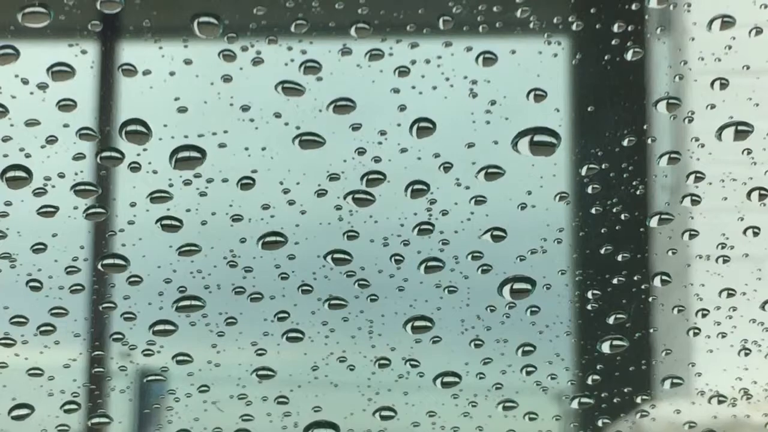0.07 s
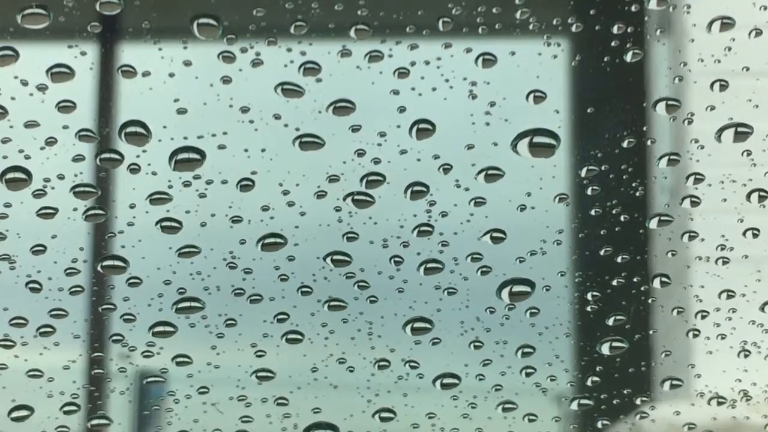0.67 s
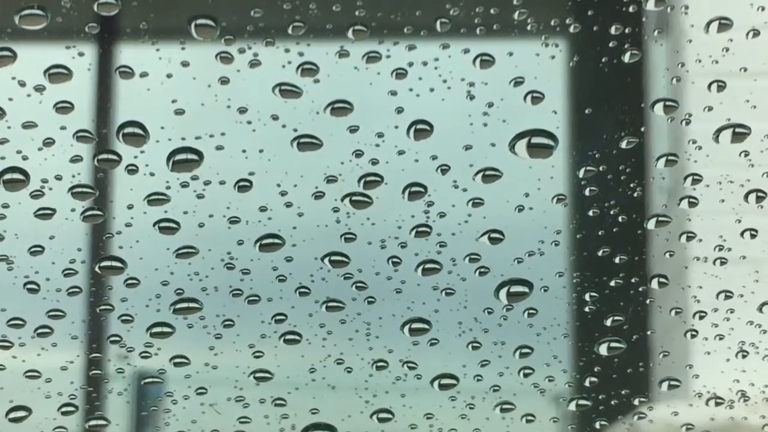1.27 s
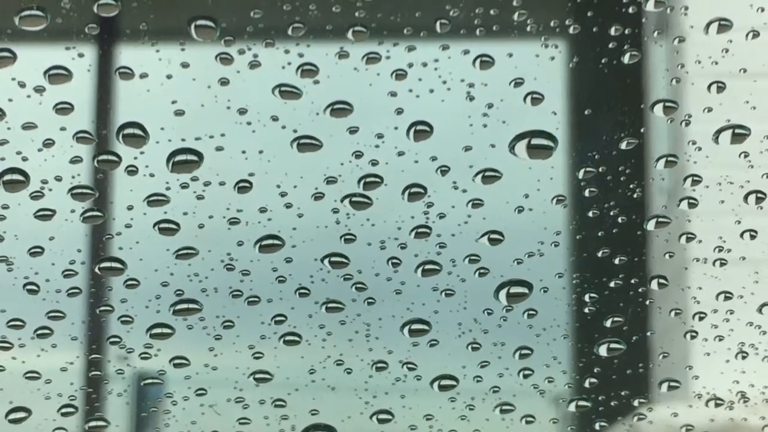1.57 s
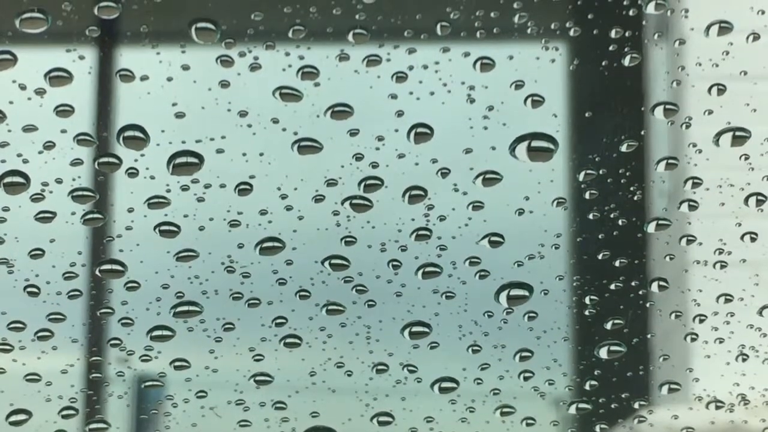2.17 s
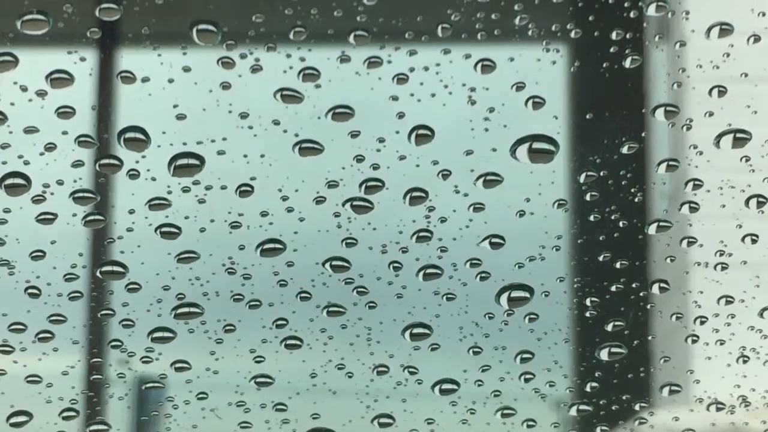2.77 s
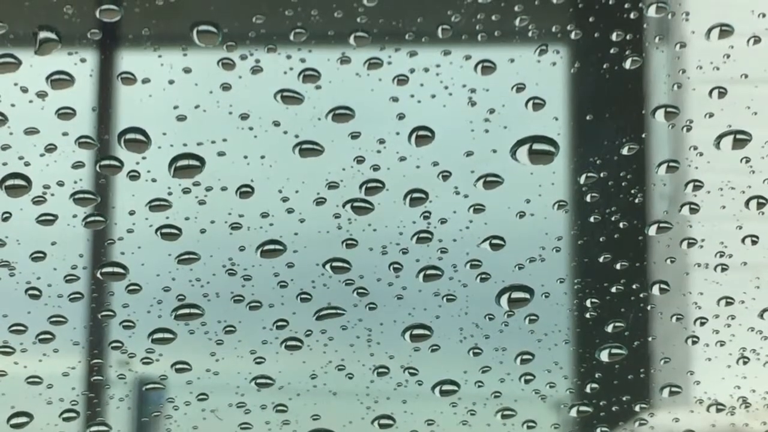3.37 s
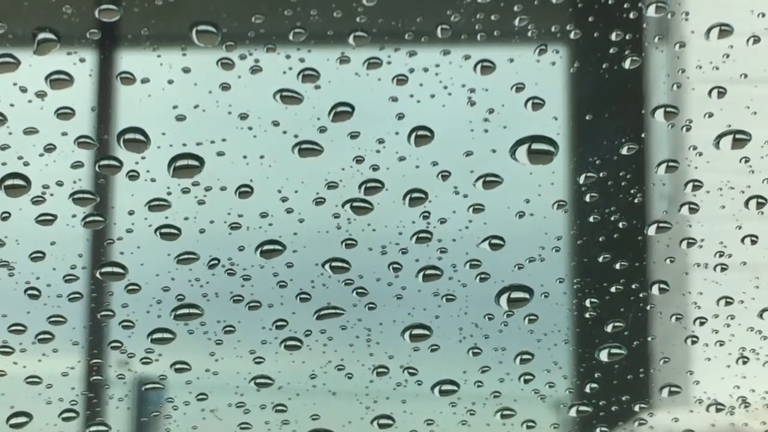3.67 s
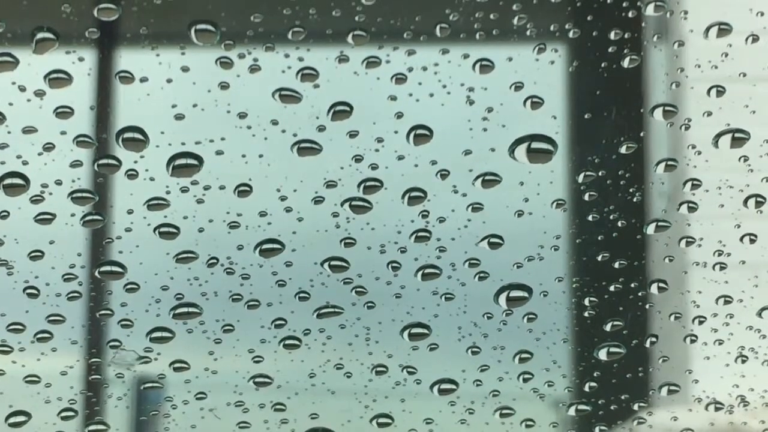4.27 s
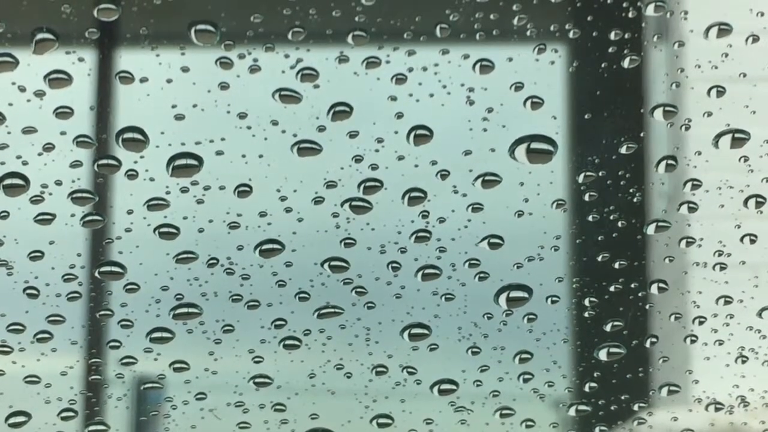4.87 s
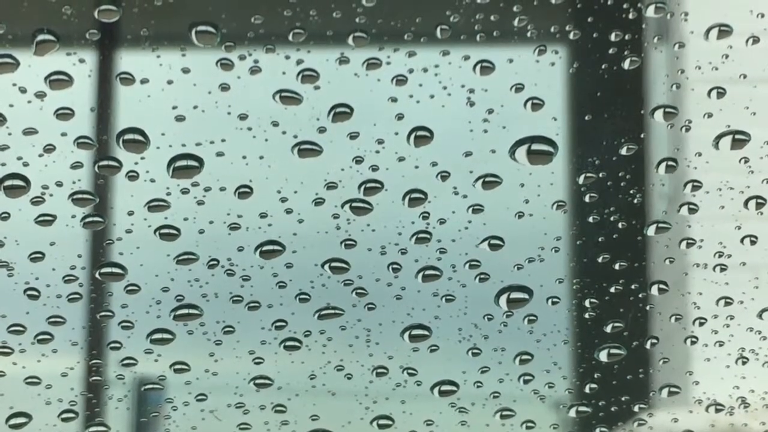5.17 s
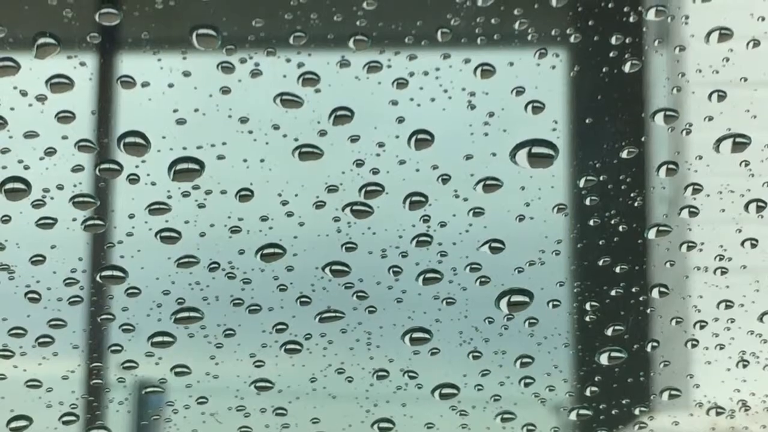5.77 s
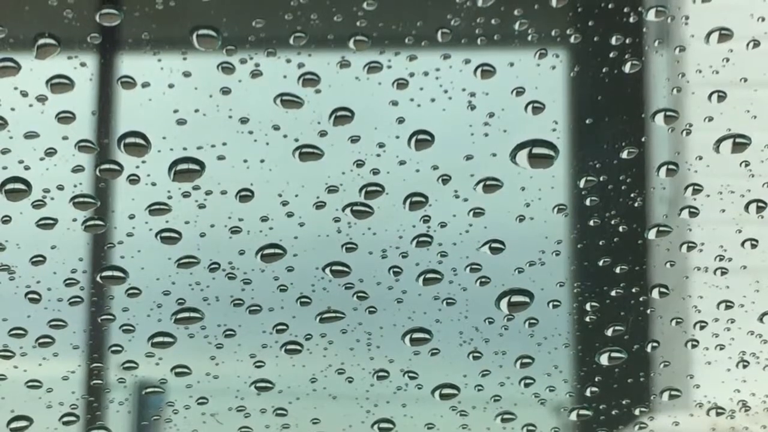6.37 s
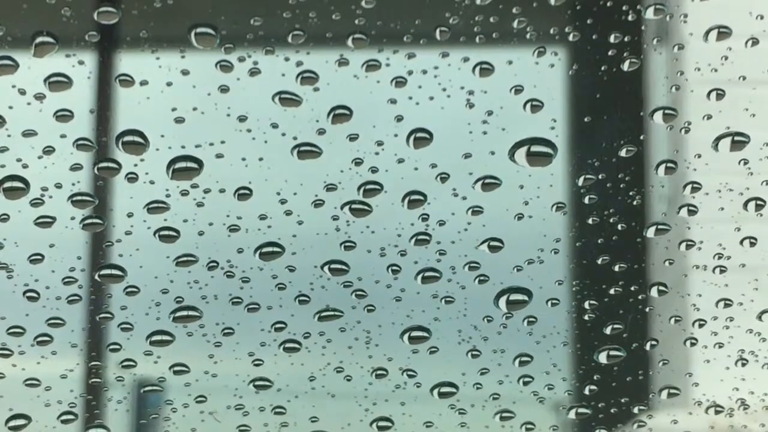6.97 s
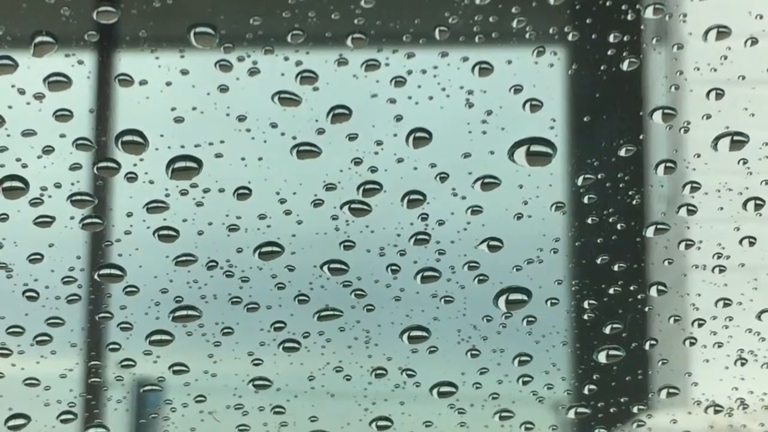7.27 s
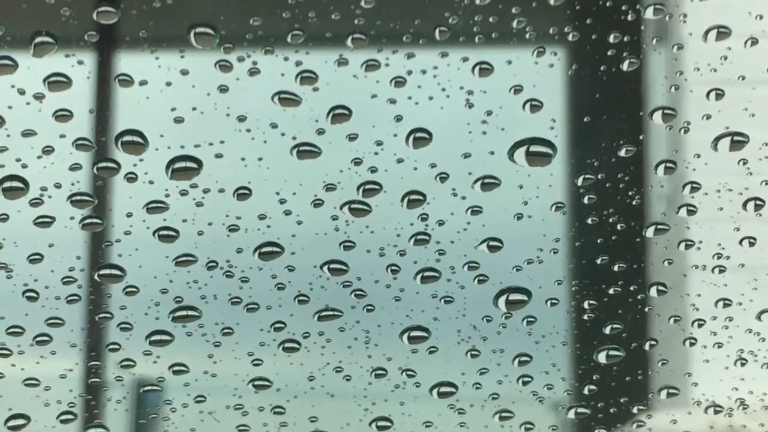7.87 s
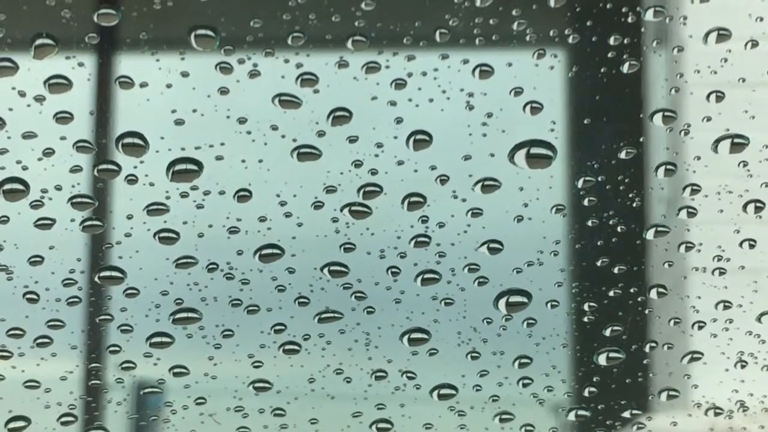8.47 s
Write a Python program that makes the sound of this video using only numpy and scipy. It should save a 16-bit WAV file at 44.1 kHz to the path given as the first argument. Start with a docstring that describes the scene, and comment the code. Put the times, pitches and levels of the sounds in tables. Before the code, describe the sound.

Scattered raindrops tap on the glass of a parked car in small flurries, above a steady engine hum and faint vent hiss.

```python
"""Light rain on an idling car

Heard from inside the parked car, single drops knock on the body and tick on the side window: each impact
launches a bending wave and sets the panel's modes ringing. Finer rain patters all around, swelling in flurries.
Beneath it sound the harmonics of the engine and a slow fan, a panel drone that grows toward the end, the rumble
of the cabin, which thins into a faint hiss in the treble, and air from the vents."""
import sys
import numpy as np
from scipy import signal
from scipy.fft import rfft, irfft, next_fast_len
from scipy.io import wavfile

SR = 44100
rng = np.random.default_rng(int(sys.argv[2]) if len(sys.argv) > 2 else 0)


def store_wav(level_fs):
    """Save 16-bit WAV to argv[1]."""
    pcm = np.round(np.clip(np.atleast_2d(level_fs), -1, 1) * 32767)
    wavfile.write(sys.argv[1], SR, pcm.T.astype(np.int16))


N = 376173
TIME = np.arange(N) / SR
RING_TIME = np.arange(SR // 12) / SR


def from_db(db):
    """Amplitude grows tenfold with every 20 dB."""
    return 10 ** (np.asarray(db) / 20)


def rms_one(x):
    """Normalise to unit mean power."""
    return x / np.sqrt(np.mean(x ** 2) + 1e-20)


def envelope(rows):
    """Amplitude over time, interpolated in decibels."""
    return from_db(np.interp(TIME, *np.transpose(rows)))


def response(rows, hz):
    """Gain at each frequency, interpolated in decibels on a logarithmic axis."""
    row_hz, row_db = np.transpose(rows)
    return from_db(np.interp(np.log(np.maximum(hz, 1)), np.log(row_hz), row_db))


def drift(rate_hz):
    """Low-passed noise gives a slow random fluctuation of rms 1."""
    pole = np.exp(-200 * np.pi * rate_hz / SR)   # one step per 100 samples
    slow = signal.lfilter([1], [1, -2 * pole, pole * pole], rng.standard_normal(N // 100 + 2002))[2000:]
    return np.interp(np.arange(N) / 100, np.arange(len(slow)), rms_one(slow))


def noise(spectrum):
    """Spectral shaping turns white noise into coloured noise of rms 1."""
    size = next_fast_len(N)
    colour = response(spectrum, np.fft.rfftfreq(size, 1 / SR))
    return rms_one(irfft(rfft(rng.standard_normal(size)) * colour, size)[:N])


def rotor(hz, orders, wander, waver_db):
    """Periodic motion radiates harmonics, modulated as speed and strength waver."""
    turns = np.cumsum(hz * (1 + wander * drift(1.12))) / SR
    tones = np.zeros(N)
    for order, db in orders:
        amplitude = np.sqrt(2) * from_db(db + waver_db * drift(3.0))
        tones += amplitude * np.sin(2 * np.pi * (round(order) * turns + rng.random()))
    return tones


def engine(firing_hz=28.0):
    """Regular firing produces a harmonic series on the firing rate."""
    # Strength of the idle. Each row: time in seconds, level in dB.
    idle = [(0, -48.5), (.9, -46), (1.4, -49.5), (2.6, -48), (7.3, -47.5), (8.53, -42.5)]
    # Engine orders. Each row: multiple of the firing rate, level in dB relative to the idle.
    orders = [(1, -46.5), (2, -10.5), (3, -4.5), (5, -10), (6, -17.5), (8, -19.5)]
    return envelope(idle) * rotor(firing_hz, orders, wander=0.00413, waver_db=3.0)


def fan(blade_hz=188.5):
    """Passing blades pulse the air at the blade rate and its octave."""
    # Fan tones. Each row: multiple of the blade rate, rms level in dB.
    orders = [(1, -57.5), (2, -70)]
    return rotor(blade_hz, orders, wander=0.003, waver_db=1.45)


def panel_drone():
    """Forced vibration: a panel drones with the engine on one low tone."""
    # Growth of the drone. Each row: time in seconds, rms level in dB.
    swell = [(4, -60), (5, -55), (7.4, -54), (8.53, -43.5)]
    return envelope(swell) * rotor(hz=103.5, orders=[(1, 0.022)], wander=0.0074, waver_db=-3.5)


def cabin_rumble():
    """Low-frequency noise fills the cabin under slight amplitude modulation; above 1.5 kHz its spectrum levels
    off into a faint flat hiss that reaches the top of the band."""
    # Rumble spectrum. Each row: frequency in Hz, relative spectral density in dB; the last level holds on up to
    # the top of the band.
    spectrum = [(20, -30), (35, -14.5), (52, -2), (80, -3.5), (112, 1), (135, -3), (195, -6), (228, -12),
                (270, -11.5), (310, -17), (390, -16.5), (460, -24.5), (700, -29), (1500, -58.5)]
    return from_db(-45.0 + 1.34 * drift(5)) * noise(spectrum)


def vent_air():
    """Air flowing from the vents radiates steady broadband noise."""
    # Hiss spectrum. Each row: frequency in Hz, relative spectral density in dB.
    spectrum = [(400, -3), (870, 1), (1200, -4.5), (1600, -7.5), (3000, -14.5), (4000, -16), (4800, -19),
                (5800, -19.5), (8300, -22), (11000, -29.5), (13000, -29.5), (16000, -31)]
    return from_db(-66.0) * noise(spectrum)


def strike(centre_hz, octaves, t60, rise_s, window_s, direct, spread_s, ping, uneven_db, mode_count=400):
    """An impact excites a dispersive bending wave, crowded modes and one ping at its centre pitch.
    The ping takes its share of the energy; direct is the wave's share of the rest."""
    # Radiation efficiency of the window. Each row: frequency in Hz, relative gain in dB.
    pane = [(300, -7), (500, 4), (700, 1.5), (900, -3), (1200, -0.5), (1550, -2.5), (2000, 2.5), (2300, -2),
            (2800, 3.5), (3900, 1.5), (4900, -2.5), (6000, -4), (9000, -10.5), (15000, -18.5)]
    centre_hz = np.asarray(centre_hz)[:, None]

    def colour(hz):
        """The size of a drop sets the band it excites."""
        return np.exp(-.5 * (np.log2(np.maximum(hz, 1) / centre_hz) / octaves) ** 2) * response(pane, hz)

    def levelled(x):
        """Give each blow the energy of a sound of rms 1 that lasts window_s."""
        return x / np.sqrt(np.sum(x ** 2, axis=1, keepdims=True) / (window_s * SR) + 1e-20)

    hz = np.fft.rfftfreq(len(RING_TIME), 1 / SR)
    turns = (rise_s - spread_s) * hz + 2 * spread_s * np.sqrt(centre_hz * hz)   # treble arrives first
    wave = irfft(colour(hz) * np.exp(-2j * np.pi * (turns + rng.random(centre_hz.shape))), len(RING_TIME))

    mode_hz = np.geomspace(300, 15500, mode_count)
    age = RING_TIME * np.sqrt(mode_hz / 1000)[:, None]   # rise_s and t60 hold at 1 kHz; treble is quicker
    decay = (1 - np.exp(-(age / rise_s) ** 2)) * from_db(-60 * age / t60)
    modes = decay * np.sin(2 * np.pi * (mode_hz[:, None] * RING_TIME + rng.random((mode_count, 1))))
    # the landing place sets the sign and the share of each mode
    sign, share = rng.standard_normal((len(centre_hz), 2, mode_count)).transpose(1, 0, 2)
    rings = (colour(mode_hz) * np.sign(sign) * from_db(uneven_db * share)) @ modes
    blow = levelled(np.sqrt(direct) * levelled(wave) + np.sqrt(1 - direct) * levelled(rings))

    cycles = centre_hz * RING_TIME
    onset = 1 - np.exp(-(RING_TIME / rise_s) ** 2)
    tone = onset * np.sin(2 * np.pi * cycles) * from_db(-60 * cycles / 90)   # 60 dB down in 90 cycles
    return levelled(np.sqrt(1 - ping) * blow + np.sqrt(ping) * levelled(tone))


def land(starts, blows, level_db, soft_s):
    """Blows superpose, each with its onset softened by spreading on its way through the panel."""
    onset = 1 - np.exp(-RING_TIME / np.reshape(np.maximum(soft_s, 1 / SR), (-1, 1)))
    track = np.zeros(N)
    for start, sound in zip(starts, blows * onset * from_db(level_db)[:, None]):
        at = int(np.clip(start * SR, 0, N - 1))
        track[at:at + len(sound)] += sound[:N - at]
    return track


def resonate(x, peaks):
    """Resonators lift or cut narrow bands; the narrower a peak, the longer it rings."""
    for hz, width_hz, db in peaks:
        x = x + (from_db(db) - 1) * signal.lfilter(*signal.iirpeak(hz, hz / width_hz, fs=SR), x)
    return x


def near_drops():
    """Impact excitation: each big drop gives a dull knock, a pitched tick and the snap of its splash."""
    # Drops that stand out. Each row: start in seconds, knock level in dB, knock centre in Hz,
    # tick level in dB, tick centre in Hz, splash level in dB. Levels hold before the onset is softened.
    drops = [(0.005, -63, 990, -55, 2670, -62.5), (0.149, -58, 756, -67, 2890, -79),
             (0.2331, -60, 725, -53.5, 3430, -68), (0.283, -61.5, 1005, -71, 2900, -82),
             (0.325, -59.5, 1120, -80, 3440, -82), (0.466, -66, 1100, -65, 2900, -79),
             (0.524, -69, 1520, -56.5, 2890, -66), (0.558, -62, 1100, -64, 2480, -82),
             (0.5725, -63, 980, -51.5, 3020, -66), (0.6402, -64, 1330, -64.5, 2820, -79),
             (0.664, -58, 888, -49, 3140, -62), (0.738, -67, 1120, -56, 3560, -71),
             (0.8578, -84, 1090, -52.5, 2740, -63), (0.983, -75, 1510, -64, 2500, -75),
             (1.002, -75, 1100, -61, 2690, -73), (1.069, -79, 1110, -50, 2865, -66),
             (1.273, -58, 1020, -64, 2780, -82), (1.411, -68, 1140, -58, 3250, -70),
             (1.695, -61.5, 900, -58, 2980, -69), (1.761, -81, 1100, -64, 3040, -77),
             (1.893, -61, 860, -65.5, 3240, -82), (1.98, -65, 944, -64.5, 2900, -82),
             (2.047, -59.5, 970, -60, 2860, -71), (2.126, -60, 870, -87, 2660, -87),
             (2.2027, -64, 1380, -58, 2680, -72), (2.227, -73, 1090, -62.5, 2470, -82),
             (2.2392, -56, 963, -55.5, 2970, -70), (2.287, -59, 690, -62, 2490, -69),
             (2.304, -58, 690, -78, 2160, -82), (2.3706, -51, 989, -47.5, 2610, -55.5),
             (2.389, -64, 1010, -58, 2850, -69), (2.424, -71, 1100, -62, 3020, -75),
             (2.618, -57.5, 940, -57.5, 2620, -69), (2.732, -56, 912, -57, 2460, -72),
             (2.772, -56, 1088, -75.0, 2210, -82), (2.8167, -63, 1255, -59, 2680, -73),
             (3.035, -59, 780, -60, 2610, -73), (3.054, -66, 900, -60, 2740, -70),
             (3.3541, -45, 534, -54, 3030, -64), (3.3607, -48.5, 1200, -55, 2420, -71),
             (3.436, -58.5, 1000, -64, 2930, -67.5), (3.464, -62, 1030, -66, 2830, -73),
             (3.527, -56.5, 1030, -63, 2220, -76), (3.591, -65, 1095, -60.5, 2670, -70),
             (3.641, -59, 1055, -71, 2670, -79), (3.685, -59.5, 1075, -72, 2700, -82),
             (3.727, -69, 1130, -65.5, 4200, -81), (3.766, -78, 2000, -59, 2220, -72),
             (4.003, -79, 1090, -63, 2600, -75), (4.051, -61, 810, -61.5, 3220, -78),
             (4.227, -80, 1100, -64, 3200, -69), (4.31, -56, 860, -64.5, 2570, -80),
             (4.547, -67, 1090, -65.5, 3050, -79), (4.592, -57, 826, -64, 2410, -79),
             (4.718, -73, 1100, -66, 3520, -80), (4.804, -53, 1128, -57, 2050, -69),
             (4.845, -78, 1110, -67, 2890, -75), (5.078, -47, 1394, -48.5, 3400, -61),
             (5.087, -52.5, 894, -62, 2470, -80), (5.109, -64, 1070, -64, 3130, -74),
             (5.136, -54.5, 982, -67, 3040, -76), (5.204, -59, 1040, -54.5, 3370, -68),
             (5.2252, -60, 1080, -56, 3060, -68), (5.252, -57.5, 1230, -66, 3150, -73),
             (5.287, -74, 790, -60.5, 2260, -74), (5.751, -86, 1100, -64.5, 2950, -76),
             (5.903, -81, 1090, -64.5, 2840, -72), (5.969, -78, 1100, -60, 2990, -69),
             (6.059, -62.5, 2190, -63, 2360, -82), (6.096, -52.5, 1413, -53, 2330, -65),
             (6.104, -64, 1400, -56, 2170, -64.5), (6.232, -57.5, 1177, -60, 2130, -80),
             (6.26, -58, 1135, -52.5, 2660, -63), (6.333, -64, 1090, -56.5, 2930, -71),
             (6.341, -73, 1120, -58, 3020, -77), (6.358, -57.5, 1200, -59, 2810, -74),
             (6.3704, -48.5, 1153, -49, 1984, -75), (6.41, -56.5, 780, -57, 2630, -70),
             (6.457, -65, 1160, -60, 2640, -69), (6.481, -64, 1120, -60, 2560, -69),
             (6.553, -80, 1090, -58, 2840, -72), (6.689, -57.5, 1055, -78, 2320, -81),
             (6.855, -63, 1150, -80, 2720, -84), (7.053, -72, 1130, -55.5, 2960, -68),
             (7.1453, -59, 840, -64, 3300, -74), (7.213, -76, 1110, -65, 3100, -74),
             (7.385, -58, 920, -65, 2740, -82), (7.51, -58.5, 990, -70, 2800, -76),
             (7.6351, -59, 910, -63, 2970, -71), (7.658, -60, 960, -73, 2740, -80),
             (7.732, -74, 1100, -67, 2620, -77), (7.883, -58.5, 1200, -69, 2130, -85),
             (7.96, -55.5, 1100, -83, 2110, -81), (8.127, -56, 1060, -58, 2450, -78),
             (8.1565, -53.5, 963, -53.5, 2410, -57), (8.167, -57, 1142, -54, 2470, -76),
             (8.205, -60, 1010, -73, 2700, -80), (8.229, -59.5, 1155, -61, 3330, -69),
             (8.2483, -74, 1050, -54, 3170, -71), (8.323, -78, 1090, -56, 3135, -72),
             (8.332, -62, 1110, -62, 3060, -68), (8.3927, -50, 817, -67, 2050, -70),
             (8.421, -57, 1020, -59.5, 2890, -72), (8.4902, -61.5, 935, -62.5, 2900, -76)]
    # Body panel modes that ring on. Each row: frequency in Hz, width in Hz, gain in dB.
    panel_modes = [(542, 30, 2.5), (889, 15, 5), (1100, 21, 3)]
    starts, knock_db, knock_hz, tick_db, tick_hz, splash_db = np.transpose(drops)
    splash_hz, splash_lag_s = np.full(len(starts), 9200), 0.0008
    distance = np.minimum(from_db(-52.5 - np.maximum(knock_db, tick_db)), 3)   # faint drops are far ones
    on_body = 1 / (1 + from_db(tick_db - knock_db))   # drops that mostly knock hit the body
    soft_s = distance * 0.00045 + on_body * 0.0025
    knock = strike(knock_hz, octaves=0.89, t60=0.08, rise_s=0.005, window_s=0.024,
                   direct=0.25, spread_s=0.0085, ping=0.07, uneven_db=4)
    tick = strike(tick_hz, octaves=0.49, t60=0.043, rise_s=0.0033, window_s=0.0066,
                  direct=0.28, spread_s=0.0066, ping=0.28, uneven_db=3)
    splash = strike(splash_hz, octaves=0.95, t60=0.16, rise_s=0.0022, window_s=0.0095,
                    direct=0.26, spread_s=0.0012, ping=0, uneven_db=2)
    impacts = land(starts, knock, knock_db, soft_s=distance * 0.0029)
    impacts += land(starts, tick, tick_db, soft_s)
    impacts += land(starts + splash_lag_s, splash, splash_db, soft_s)
    return resonate(impacts, panel_modes)


def flurry_lift(times, rise_s=0.92, fall_s=0.64):
    """Flurries modulate the fine rain in bell curves that build more slowly than they die away."""
    # Flurries. Each row: time of the peak in seconds, full lift in dB, of which a patter takes a share.
    flurries = [(0.03, 14), (2.35, 12), (3.45, 10), (5.2, 6.5), (6.2, 13), (7.7, 8.5), (8.4, 10)]
    return sum(lift_db * np.exp(-((times - top) / np.where(times < top, rise_s, fall_s)) ** 2)
               for top, lift_db in flurries)


def patter(count, level_db, uneven_db, flurry_share, centre_hz, scatter_octaves, octaves, t60,
           soft_s, ping):
    """Shot noise: fine drops land at random, each with its own size and pitch, louder in a flurry."""
    starts = rng.random(count) * N / SR
    size_db = uneven_db * rng.uniform(-1.04, 1, count)
    pitch_hz = centre_hz * 2 ** (scatter_octaves * rng.standard_normal(count))
    blows = strike(pitch_hz, octaves, t60, rise_s=0.0021, window_s=0.0097,
                   direct=0.05, spread_s=0.006, ping=ping, uneven_db=8, mode_count=320)
    return land(starts, blows, level_db + size_db + flurry_share * flurry_lift(starts), soft_s)


def cabin_reflections(x, wet_db, t60, build_s):
    """Reverberation: close seats and glass return a short wash of reflections."""
    onset = 1 - np.exp(-(RING_TIME / build_s) ** 2)
    tail = rng.standard_normal(len(RING_TIME)) * from_db(-60 * RING_TIME / t60) * onset
    tail = signal.sosfilt(signal.butter(1, 5000, fs=SR, output="sos"), tail / np.linalg.norm(tail))
    return x + from_db(wet_db) * signal.fftconvolve(x, tail)[:N]


def scene():
    """Superposition: rain on the glass and roof adds to the sounds of the idling car."""
    on_glass = patter(count=600, level_db=-79.5, uneven_db=1.5, flurry_share=0.71, centre_hz=2688,
                      scatter_octaves=0.39, octaves=0.33, t60=0.13, soft_s=0.0029, ping=0.2)
    on_roof = patter(count=430, level_db=-68.5, uneven_db=5, flurry_share=0.28, centre_hz=1053.6,
                     scatter_octaves=0.38, octaves=0.25, t60=0.12, soft_s=0.0041, ping=0.56)
    rain = cabin_reflections(near_drops() + on_glass + on_roof, wet_db=-8.0, t60=0.16, build_s=0.0056)
    car = engine() + fan() + panel_drone() + cabin_rumble() + vent_air()
    return (rain + car)[None]


def record(dry):
    """Cabin resonances in the midrange and microphone notches in the treble colour the whole sound;
    a steep low-pass cuts the top."""
    # Peaks and dips of the cabin and microphone. Each row: frequency in Hz, width in Hz, gain in dB.
    colour_peaks = [(736, 188, -5), (857, 79, 4), (1048, 32, -14), (1073, 28, 6.5), (4850, 320, -5),
                    (7530, 670, -4), (10360, 630, -4.5), (12550, 300, 2.5)]
    padded = np.pad(resonate(dry[0], colour_peaks), 400, "reflect", reflect_type="odd")
    low_pass = signal.firwin(801, cutoff=15650, fs=SR)
    return signal.fftconvolve(padded, low_pass, mode="valid")[None]


dry = scene()
out = record(dry)
store_wav(out)
```